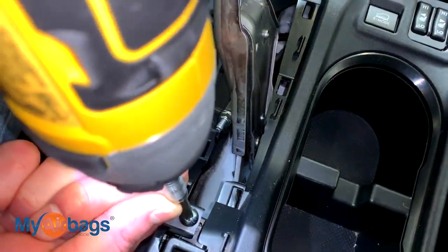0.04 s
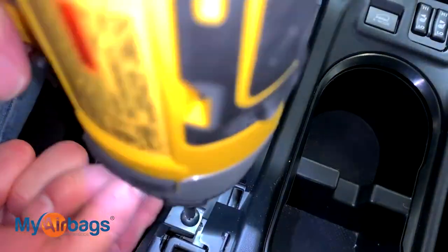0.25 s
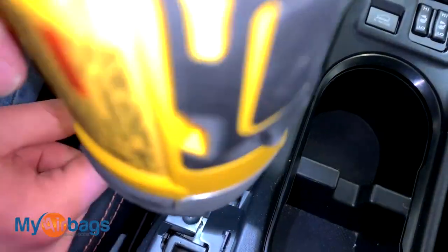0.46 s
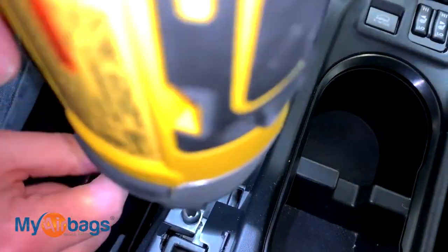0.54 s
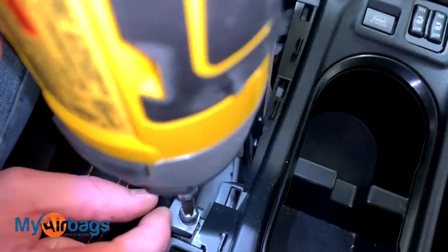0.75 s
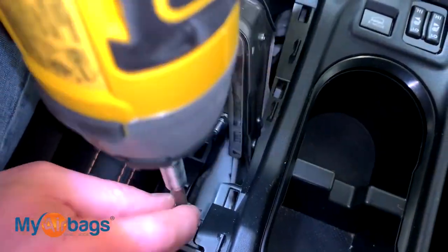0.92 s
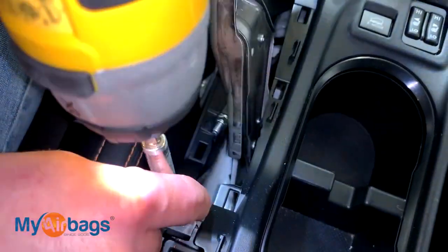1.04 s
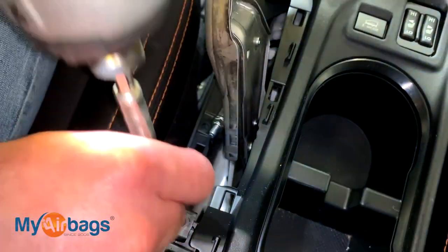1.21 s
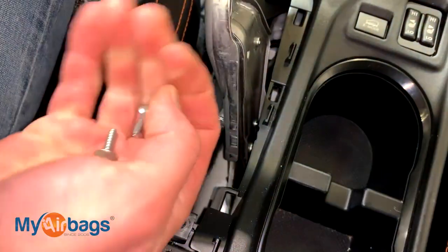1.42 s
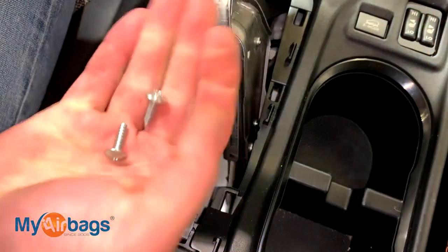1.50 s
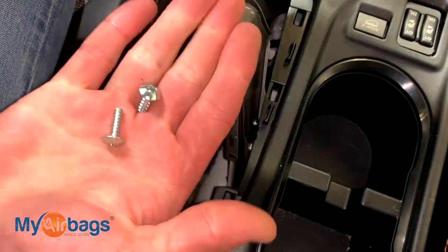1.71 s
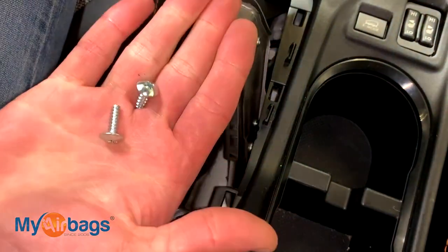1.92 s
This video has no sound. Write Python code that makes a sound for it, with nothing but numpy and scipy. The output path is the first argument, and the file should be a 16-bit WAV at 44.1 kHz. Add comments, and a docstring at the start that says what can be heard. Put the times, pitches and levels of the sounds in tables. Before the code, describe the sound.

Small clicks of a bit on plastic, then a fizzing, rasping drill run of under a second with knocks and console booms; it cuts off, light knocks follow, then a soft swish and low rumble, close stereo microphone.

```python
"""Cordless drill in a parked car

Inside the padded cabin, close to two microphone ports, a drill backs a screw out of a plastic console.
The bit clicks into the screw head; noise bursts fizz once a motor turn, a rung gearbox rasps once a
chuck turn, and struck resonances give the bit's rattle and the knocks and booms of the console.
The drill lifts off with a knock; a hand brings the screws up with a noise swish and low rumble."""
import sys
import numpy as np
from scipy import signal
from scipy.fft import rfft, irfft
from scipy.io import wavfile

SR = 44100
rng = np.random.default_rng(int(sys.argv[2]) if len(sys.argv) > 2 else 0)


def int16_out(signal):
    """Quantize to a 16-bit WAV file."""
    q = np.round(np.clip(np.atleast_2d(signal).T, -1, 1) * 32767)
    wavfile.write(sys.argv[1], SR, q.astype(np.int16))


N = 85995  # samples


def undb(db):
    """Decibels to gain."""
    return 10 ** (np.asarray(db) / 20)


def curve(rows, axis=1):
    """Interpolate one column of a timed table to every sample."""
    rows = np.array(rows)
    return np.interp(np.arange(N) / SR, rows[:, 0], rows[:, axis])


def unit(x):
    """Scale to rms 1."""
    return x / np.sqrt(np.mean(x ** 2))


def over_hz(rows, axis=1):
    """Interpolate one column of a table over log frequency, for every bin of a padded transform."""
    rows = np.array(rows)
    bin_hz = np.arange(N + 1) * SR / (2 * N)
    return np.interp(np.log(bin_hz + 1), np.log(rows[:, 0]), rows[:, axis])


def colour(x, spectrum):
    """Causal minimum-phase filter with the given spectrum; white noise keeps its level."""
    gain = unit(undb(over_hz(spectrum)))
    # folding the cepstrum onto positive times makes the filter causal
    cepstrum = irfft(np.log(gain))
    cepstrum[1:N] *= 2
    cepstrum[N + 1:] = 0
    response = np.exp(rfft(cepstrum, 2 * N))
    return irfft(rfft(x, 2 * N) * response)[..., :N]


PORT_SPREAD = 0.57  # unshared noise against shared


def noise():
    """White noise at the two ports, partly shared."""
    mid, side = rng.standard_normal((2, N))
    return unit(np.array([mid + PORT_SPREAD * side, mid - PORT_SPREAD * side]))


def ring(x, modes, bend_s=0., scatter_db=0.):
    """Drive a set of damped modes; low ones may arrive later. A unit tap peaks at 1."""
    t, tap = np.arange(SR // 4) / SR, 0
    last_hz = modes[-1][0]
    for k, (hz, db, t60) in enumerate(modes):
        delay = bend_s * (np.sqrt(1000 / hz) - np.sqrt(1000 / last_hz))
        age = np.maximum(t - delay, 0)
        level = (-1) ** k * undb(db + scatter_db * rng.standard_normal())
        decay = np.exp(-np.log(1000) * age / t60)
        tap = tap + level * np.sin(2 * np.pi * hz * age) * decay
    low_cut = signal.butter(2, 0.38 * modes[0][0], "high", fs=SR, output="sos")
    tap = signal.sosfilt(low_cut, tap)
    return signal.fftconvolve(np.atleast_2d(x), tap[None] / np.abs(tap).max(), axes=1)[:, :N]


def taps(rows, axis=1):
    """One impulse for each row, at its time and the level in the chosen column."""
    rows, out = np.array(rows), np.zeros(N)
    places = np.clip(rows[:, 0] * SR, 0, N - 1).astype(int)
    np.add.at(out, places, undb(rows[:, axis]))
    return out


def fade(x, decay_s):
    """Give every impulse an exponential tail."""
    return signal.lfilter([1], [1, -np.exp(-1 / (SR * decay_s))], x)


# spectrum of the cabin's steady background: pitch_hz, relative level_db
CABIN_SPECTRUM = [(30, 4.5), (200, -5), (500, -11), (1000, -23.5), (3000, -25), (15000, -36.5)]
CABIN_DB = -68


def cabin_background():
    """Steady, mostly low noise of the cabin at both ports."""
    return undb(CABIN_DB) * colour(noise(), CABIN_SPECTRUM)


CABIN_T60_S = .11


def cabin_echo(near):
    """The padded cabin answers with a short decaying noise tail, dulled in the treble."""
    t = np.arange(SR // 4) / SR
    decay = np.exp(-np.log(1000) * t / CABIN_T60_S)
    echo = rng.standard_normal((2, len(t))) * decay * (t > .003)
    echo /= np.sqrt(np.sum(echo ** 2, axis=1, keepdims=True))
    wet = signal.fftconvolve(near, echo, axes=1)[:, :N]
    return signal.sosfilt(signal.butter(1, 3500, fs=SR, output="sos"), wet)


# small surfaces near the microphone: left_delay_s, right_delay_s, level_db
NEARBY_SURFACES = [(.0007, .0011, -15), (.0017, .0014, -16), (.0027, .0029, -11), (.0049, .0043, -14)]
NEARBY_ABOVE_HZ = 2200


def reflections():
    """Response of each port to small surfaces nearby, which mirror mainly the treble."""
    jf = 1j * np.arange(N + 1) * SR / (2 * N)
    paths = 0
    for left_s, right_s, db in NEARBY_SURFACES:
        paths = paths + undb(db) * np.exp(-2 * np.pi * jf * np.array([[left_s], [right_s]]))
    treble = (jf / (NEARBY_ABOVE_HZ + jf)) ** 2
    return 1 + paths * treble


# the two microphone ports: pitch_hz, left_minus_right_db, left_lead_rad
PORTS = [(60, -1.2, 0), (300, -.2, .1), (600, .6, .12), (1100, 2.1, .25), (2200, 3, .2), (3100, 6.5, .6),
         (4000, 5, 2.8), (5500, 2.5, 3.4), (7500, 3, 3.8), (9000, 4.5, 6.3), (12000, .5, 6.7),
         (15000, 0, 9)]


def at_ports(near):
    """Direct sound, with the level and phase differences of the ports and nearby reflections."""
    tilt = undb(over_hz(PORTS) / 2)
    ports = np.array([tilt, np.exp(-1j * over_hz(PORTS, axis=2)) / tilt])
    return irfft(rfft(near, 2 * N) * ports * reflections())[:, :N]


# fingers on the trim: time_s, level_db
FINGERS = [(.03, -66.5), (.07, -55.5), (.2, -59), (.24, -60.5), (1.14, -54), (1.23, -55), (1.29, -75.5),
           (1.42, -64.5), (1.47, -75), (1.95, -88.5)]
# spectrum of the rubbing: pitch_hz, relative level_db
RUBBING = [(200, 1.5), (550, 3), (1100, -3), (2200, -14.5), (15000, -35.5)]
# the hand moving up: time_s, swish_db, rumble_db
HAND = [(0, -85, -75), (.3, -82, -82), (1.2, -73, -62), (1.34, -73, -53), (1.4, -64.5, -61),
        (1.44, -61.5, -48), (1.51, -62, -54.5), (1.58, -63.5, -47), (1.69, -64, -44), (1.8, -72, -48.5),
        (1.95, -83.5, -51.5)]
# spectra of the hand's swish and rumble: pitch_hz, relative level_db
SWISH = [(200, -3.5), (600, 0.5), (2000, -2), (5000, -2), (7000, -3), (9800, 1.5), (11500, -7.5),
         (13500, 3), (15500, -5.5)]
RUMBLE = [(12, -20.5), (25, -6.5), (38, -1.5), (60, -3.5), (90, -13), (200, -44), (600, -65)]
SWISH_LEFT_DB = 3.5  # left port above right


def hand():
    """Coloured noise for fingers rubbing the trim, then a soft swish and low handling rumble."""
    rub = colour(noise() * undb(curve(FINGERS)), RUBBING)
    balance_db = np.array([[SWISH_LEFT_DB], [-SWISH_LEFT_DB]]) / 2
    swish = colour(noise(), SWISH) * undb(curve(HAND) + balance_db)
    rumble = unit(colour(rng.standard_normal(N), RUMBLE)) * undb(curve(HAND, axis=2))
    return rub + swish + rumble


# bumps on the console: time_s, deep boom_db, panel thock_db
BUMPS = [(.051, -44.5, -30.5), (.095, -45, -37.5), (.11, -29.5, -48), (.168, -31.5, -37.5),
         (.193, -38, -37.5), (.274, -37, -20.5), (.291, -21.5, -14.5), (.303, -24, -22), (.416, -23, -25.5),
         (.772, -25.5, -39), (.843, -21, -29.5), (.945, -28.5, -34.5), (1.198, -36.5, -31.5),
         (1.252, -46.5, -55), (1.41, -41.5, -51)]
# steady boom under hand and drill: time_s, level_db
BOOM = [(0, -48), (.06, -46.5), (.18, -35.5), (.24, -45), (.31, -33), (.42, -32.5), (.6, -34.5), (.88, -35),
        (1.06, -39), (1.15, -44), (1.27, -47), (1.42, -57), (1.46, -66.5), (1.7, -65.5), (1.8, -79),
        (1.95, -71)]
# resonances of the hollow console and of its panel: pitch_hz, relative level_db, t60_s
CONSOLE = [(85, -15, 0.067), (115.85, -12.5, .3), (178, 0.5, 0.11), (209.2, -0.5, .08), (244, -9.5, 0.071),
           (293.7, -11, .09), (406, -14.5, 0.1)]
PANEL = [(239, -3, .04), (324, -1.5, .05), (350, -1, 0.063), (423, -0.5, .05), (468, -3, 0.1),
         (608, -6.5, 0.033)]
BEND_S = .0012  # scale of the later arrival of low modes in plastic


def console():
    """The hollow console booms under bumps and steady shaking; its panel thocks."""
    boom = ring(taps(BUMPS), CONSOLE)
    thock = ring(taps(BUMPS, axis=2), PANEL, BEND_S)
    push = rng.standard_normal(N) + 0.17 * noise()
    shaking = colour(push, [(40, -3.5), (100, 3.5), (500, -3), (1200, -12.5)])
    return boom + thock + unit(ring(shaking, CONSOLE)) * undb(curve(BOOM))


# resonances of the plastic trim: pitch_hz, relative level_db, t60_s
TRIM = [(701.4, -7, 0.027), (805.5, -3, .04), (882.6, -2.5, .03), (981, -3.5, .022), (1108, -1.5, .026),
        (1361, -4, .026), (1460, -6.5, .022), (1908, -16.5, .018)]
CONTACT_S, CONTACT_GRIT = 0.0023, 0.084  # decay and relative strength of the grit
STRIKE_SCATTER_DB = 3.5  # of each mode from spot to spot


def trim(hits, count=3):
    """Gritty contacts ring the plastic trim from a few different spots."""
    spot = np.cumsum(hits != 0) % count
    total = 0
    for k in range(count):
        struck = hits * (spot == k)
        grit = CONTACT_GRIT * fade(struck, CONTACT_S) * rng.standard_normal(N)
        total = total + ring(struck + grit, TRIM, BEND_S, STRIKE_SCATTER_DB)
    return total


# contacts of bit, screw and trim: start_s, trim ring_db, relative hard tick_db
KNOCKS = [(.0455, -17, -15.5), (.0495, -24, -19), (.055, -25, -21.5), (.0615, -24.5, -25), (.075, -32, -50),
          (.081, -36, -36), (.0945, -27.5, -30), (.131, -39, -49), (.152, -39.5, -40.5), (.1685, -22, -38),
          (.176, -41, -43), (.186, -31.5, -38), (.190, -44, -33), (.195, -24.5, -27), (.205, -45, -42.5),
          (.264, -16, -28.5), (.2715, -8, -18), (.281, -15, -18), (.2895, -13, -14.5), (.300, -14, -10),
          (.320, -15, -29.5), (.373, -16, -28), (.410, -16.5, -30), (.435, -14, -16.5),
          (.464, -14.5, -28.5), (.522, -15, -21), (.581, -22, -30.5), (.596, -19.5, -30),
          (.608, -18.5, -17.5), (.678, -22, -47), (.736, -32, -20), (.815, -24.5, -25.5), (.827, -27, -19),
          (.948, -29, -32), (.982, -23.5, -22.5), (1.038, -20.5, -19), (1.071, -29.5, -24),
          (1.112, -27.5, -23), (1.148, -33.5, -43.5), (1.188, -36, -45), (1.195, -30, -24.5),
          (1.1975, -25.5, -42), (1.206, -33, -61), (1.215, -34.5, -50.5), (1.251, -56, -40.5),
          (1.272, -71, -55), (1.297, -67.5, -52.5), (1.415, -55, -59.5)]
# metallic snaps as the drive starts and takes up slack: start_s, relative level_db
SNAPS = [(.2512, -13.5), (.2612, -10), (.263, -18.5), (.298, -13.5), (.523, -18), (.564, -17)]
# spectra of the hard ticks and the snaps: pitch_hz, relative level_db
TICK = [(800, -26.5), (2000, 3.5), (2900, 1), (4500, -1), (6000, -7), (9000, -21), (15000, -23.5)]
SNAP = [(1500, -23), (4000, -6.5), (9000, 3.5), (12000, -1.5), (15500, -3.5)]
# resonances of the gearbox: pitch_hz, relative level_db, t60_s
GEARBOX = [(1906, -11.5, 0.0064), (2494, -4, 0.029), (2757, -1.5, .024), (3123, -2.5, 0.017),
           (3814, -1, .022), (4020, -1, 0.039), (4397, 4, 0.039)]
TICK_DECAY_S, SNAP_DECAY_S = 0.0026, .002
TICK_RING_DB = -4  # gearbox ring against the tick's impulse


def contacts():
    """Knocks ring the trim, their hard ticks also ring the gearbox; the drive's snaps are noise bursts."""
    ticks = taps(KNOCKS, axis=2)
    hard = 0.45 * colour(fade(ticks, TICK_DECAY_S) * noise(), TICK)
    gearbox = undb(TICK_RING_DB) * ring(ticks, GEARBOX)
    snaps = 0.38 * colour(fade(taps(SNAPS), SNAP_DECAY_S) * noise(), SNAP)
    return trim(taps(KNOCKS)) + hard + gearbox + snaps


# drill speed and loudness: time_s, motor turns_per_s, relative level_db
RUN = [(.25, 400, -8), (.29, 461, 6), (.33, 516, 3), (.435, 587, 4.5), (.48, 618, 4.5), (.61, 650, 2),
       (.72, 667, 1.5), (.795, 710, 1.5), (.835, 610, -1), (.88, 587, -0.5), (.95, 620, 0.5), (1.0, 628, 0),
       (1.075, 594, 0.5), (1.125, 443, -2)]
START_S, STOP_S, ATTACK_S, RELEASE_S = .251, 1.127, 0.005, 0.01387
GEAR_RATIO = 26.9  # motor turns per chuck turn
CHUCK_TOP_S = .604  # a moment at which the chuck passes its tight spot


def drive():
    """Turns made by the motor and the geared-down chuck, and the trigger's gate."""
    t = np.arange(N) / SR
    motor = np.cumsum(curve(RUN)) / SR
    chuck = (motor - np.interp(CHUCK_TOP_S, t, motor)) / GEAR_RATIO
    attack = np.clip((t - START_S) / ATTACK_S, 0, 1)
    release = np.clip(1 - (t - STOP_S) / RELEASE_S, 0, 1) ** 2
    return motor, chuck, attack * release


# pressure on the screw: time_s, load_db, chuck wobble (about 0-1)
LOAD = [(.25, -4, 0), (.33, -3, 0.88), (.44, 1, 1.01), (.61, 1.5, 0.79), (.73, -2, 0.8), (.84, -4, 0.6),
        (.93, -8, .55), (1.0, -16, 0.56), (1.04, -7.5, 0.74), (1.13, -9, 0.7)]
# spectrum of the grinding thread: pitch_hz, relative level_db
GRIND = [(100, -26.5), (280, -7.5), (450, -4.5), (560, -10.5), (820, 0.5), (1350, -4.5), (1700, -12.5),
         (1900, -16.5), (2150, -12.5), (4000, -30)]
RATTLE_PER_TURN = 3  # slips per chuck turn
RATTLE_DB, RATTLE_SCATTER_DB, GRIND_DB = -20, 2.5, -32  # levels before the load


def bit_rattle(chuck, gate):
    """The bit slips in the screw head a few times a chuck turn; the thread grinds in between."""
    slips = np.flatnonzero(np.diff(np.floor(chuck * RATTLE_PER_TURN))) / SR
    chance = rng.standard_normal((len(slips), 2))
    times = slips + .0018 * chance[:, 0]
    hits = taps(np.c_[times, RATTLE_DB + RATTLE_SCATTER_DB * chance[:, 1]])
    load = gate * undb(curve(LOAD))
    grind_level = gate * undb(GRIND_DB + 0.82 * curve(LOAD))
    grind = colour(rng.standard_normal(N) * grind_level, GRIND)
    return trim(hits * load * undb(-4)) + grind


RASP_DB, RASP_SWING_DB, RASP_LAG_TURNS, RASP_EDGE = -31, 5, 0.21, 2.5  # level before the load
WHINE_DB = 5  # clicks against steady noise
GEAR_JITTER_TURNS, GEAR_SCATTER_DB = 0.022, 3.5


def gears(motor, chuck):
    """A tooth click on each motor turn rings the gearbox, hardest during half of each chuck turn."""
    chance = rng.standard_normal((N // 20, 2))[(motor + .5).astype(int)].T
    off_turns = (motor + .5) % 1 - .5 + GEAR_JITTER_TURNS * chance[0]
    off_samples = off_turns * SR / curve(RUN)
    clicks = unit(np.exp(-off_samples ** 2 / 2) * undb(GEAR_SCATTER_DB * chance[1]))
    bind = np.tanh(RASP_EDGE * np.cos(2 * np.pi * (chuck - RASP_LAG_TURNS)))
    bind = bind * curve(LOAD, axis=2)
    rung = unit(ring(undb(WHINE_DB) * clicks + noise(), GEARBOX))
    return rung * undb(RASP_DB + RASP_SWING_DB * bind + curve(LOAD))


# spectra of the motor's fizz and scrape: pitch_hz, relative level_db
FIZZ = [(1500, -18), (2500, -9.5), (3600, -2.5), (5000, 2), (7000, -1.5), (8300, 2), (10000, -1),
        (13500, -1), (14500, 0), (15500, 0)]
SCRAPE = [(5000, -24.5), (8000, -11.5), (9500, -5), (11600, 0.5), (12600, -5), (13800, -11.5), (15500, -7)]
# levels before the loudness in RUN; SHARP narrows each burst, BASE is the steady part
FIZZ_DB, FIZZ_SWING_DB, FIZZ_SHARP, FIZZ_BASE = -31, 2.5, 2.5, 0.38
SCRAPE_DB, SCRAPE_SWING_DB, SCRAPE_SHARP, SCRAPE_BASE = -35, 7.5, 9.6, 0.05


def motor_fizz(motor, chuck):
    """Noise bursts fizz on every motor turn, with a scrape that swells at the chuck's tight spot."""
    turn = np.cos(2 * np.pi * motor) - 1
    tight = np.cos(2 * np.pi * chuck) * curve(LOAD, axis=2)
    # each motor turn has its own random strength
    uneven = undb(2.2 * rng.standard_normal(N // 20))[(motor + .5).astype(int)]
    fizz_bursts = unit(FIZZ_BASE + uneven * np.exp(FIZZ_SHARP * turn))
    fizz = colour(noise() * fizz_bursts, FIZZ) * undb(FIZZ_DB + FIZZ_SWING_DB * tight)
    scrape_bursts = unit(SCRAPE_BASE + uneven * np.exp(SCRAPE_SHARP * turn))
    scrape = colour(noise() * scrape_bursts, SCRAPE) * undb(SCRAPE_DB + SCRAPE_SWING_DB * tight)
    return (fizz + scrape) * undb(curve(RUN, axis=2))


CABIN_WET_DB = -18.5


def scene():
    """Drill and handling in the small padded cabin, heard close by at two ports."""
    motor, chuck, gate = drive()
    drill = gate * (motor_fizz(motor, chuck) + gears(motor, chuck))
    near = console() + contacts() + bit_rattle(chuck, gate) + drill
    wet = undb(CABIN_WET_DB) * cabin_echo(near)
    return cabin_background() + wet + hand() + at_ports(near)


TOP_HZ = 15900


def record(dry):
    """The recorder cuts the top with a steep low-pass."""
    return signal.sosfilt(signal.ellip(10, .2, 80, TOP_HZ, fs=SR, output="sos"), dry)


dry = scene()
out = record(dry)
int16_out(out)
```